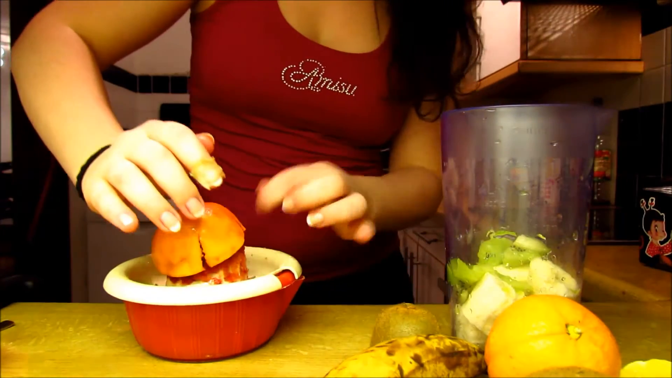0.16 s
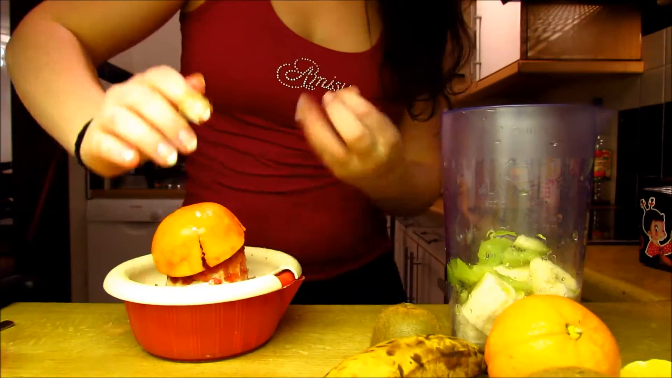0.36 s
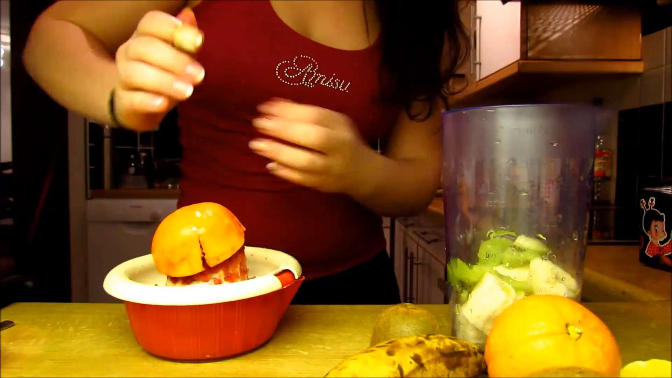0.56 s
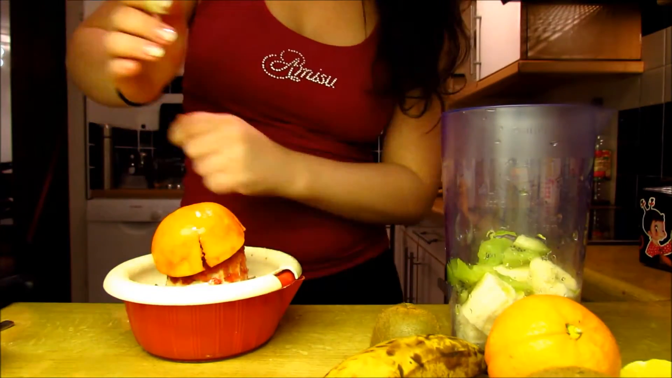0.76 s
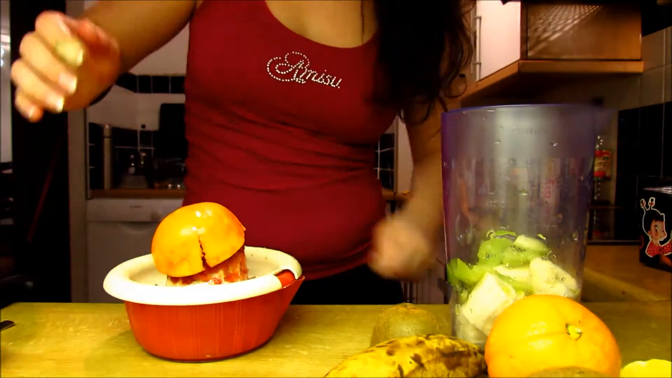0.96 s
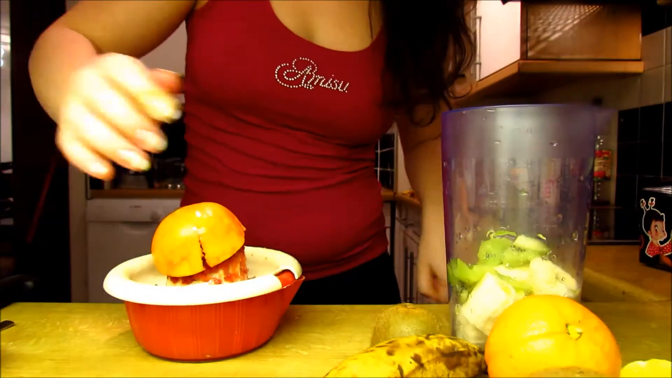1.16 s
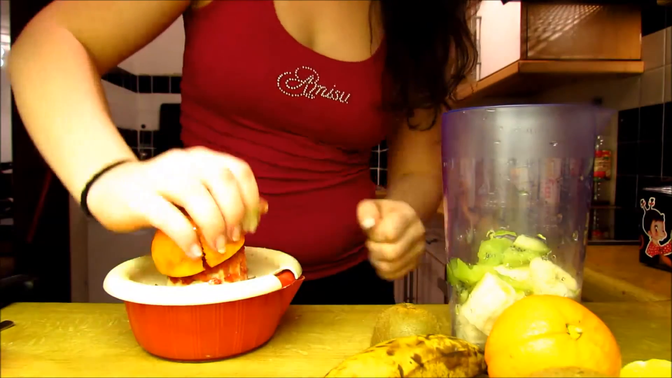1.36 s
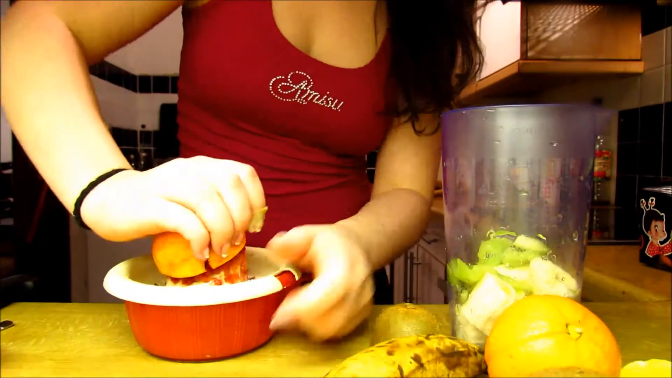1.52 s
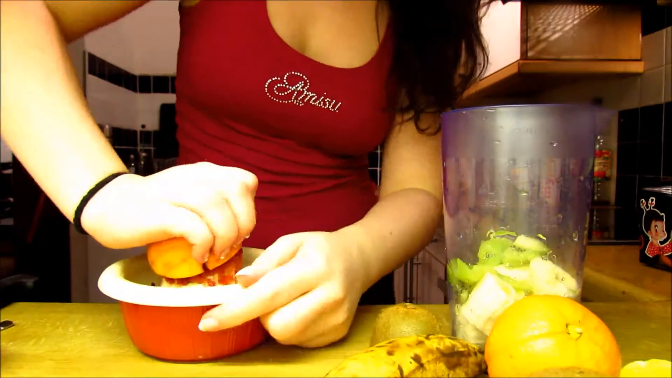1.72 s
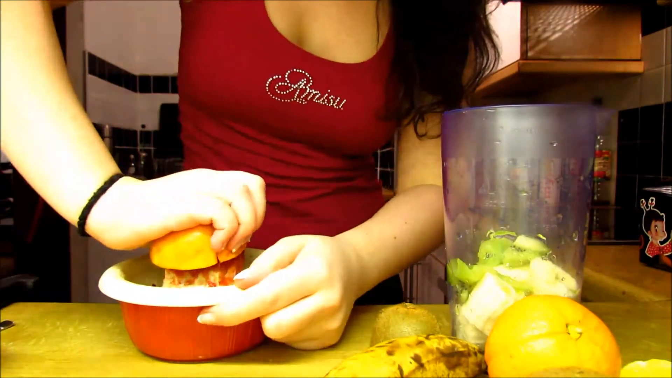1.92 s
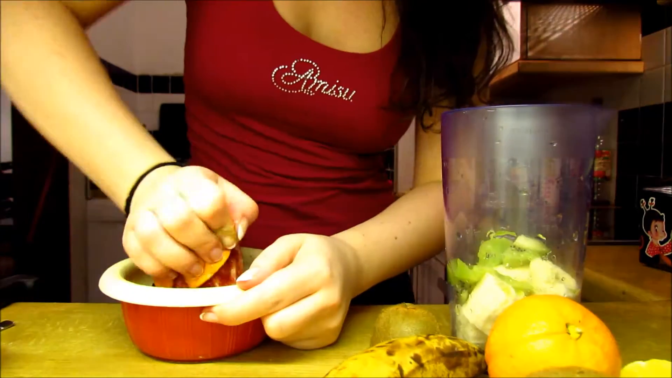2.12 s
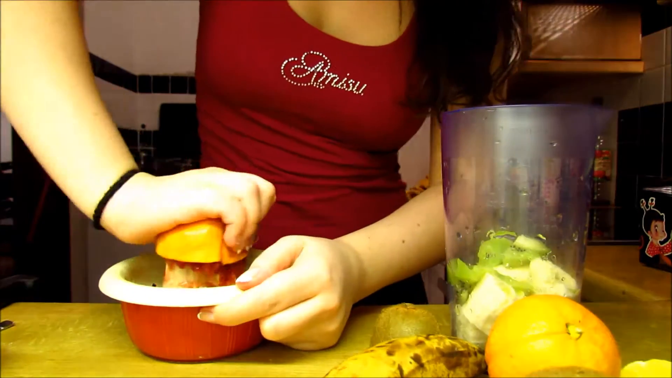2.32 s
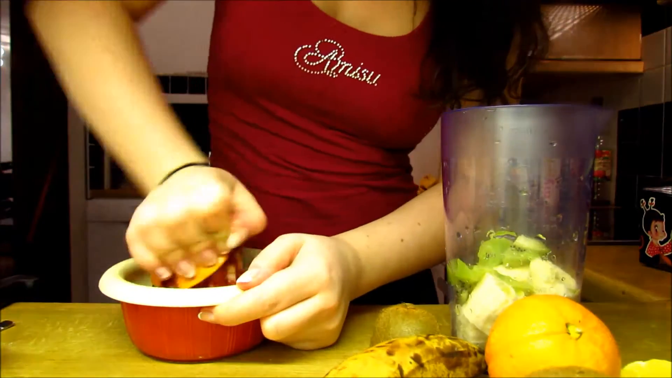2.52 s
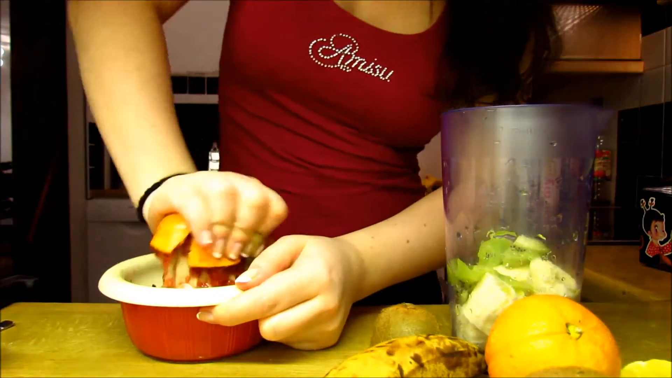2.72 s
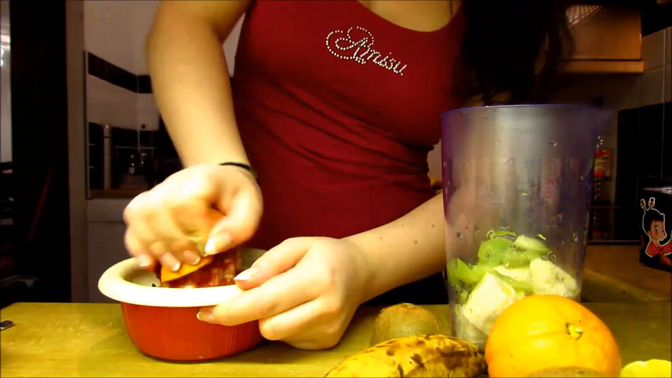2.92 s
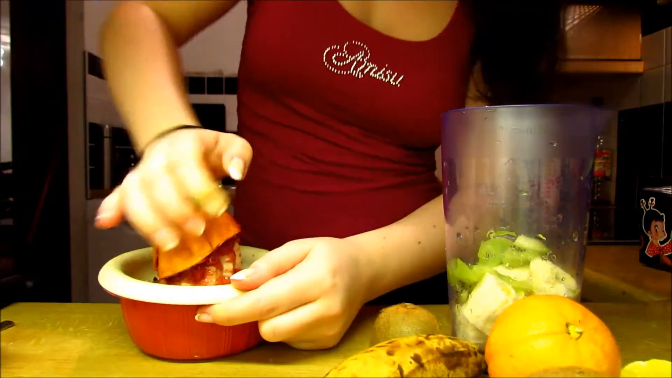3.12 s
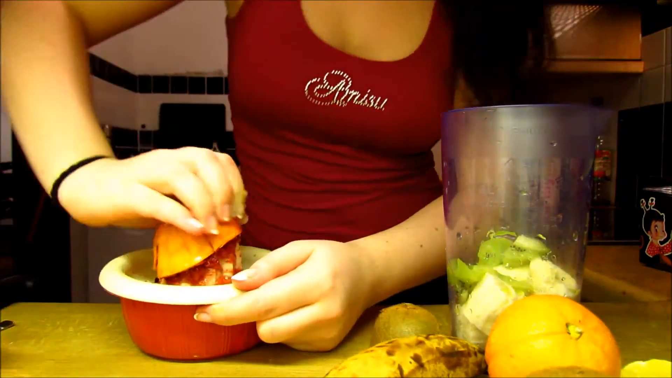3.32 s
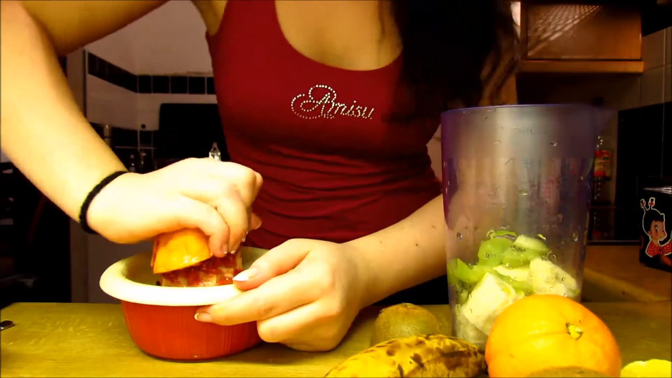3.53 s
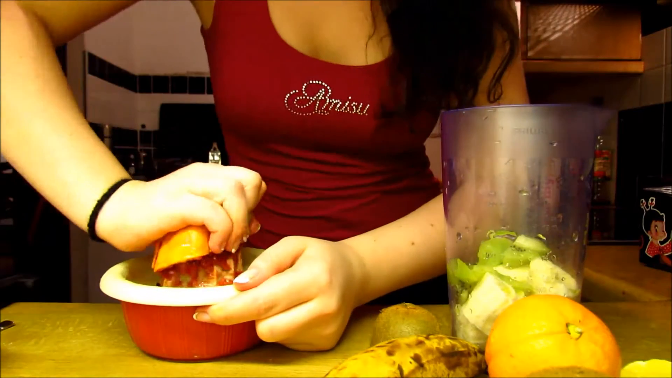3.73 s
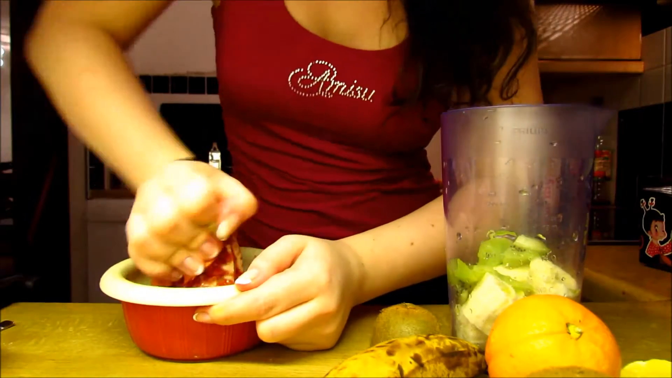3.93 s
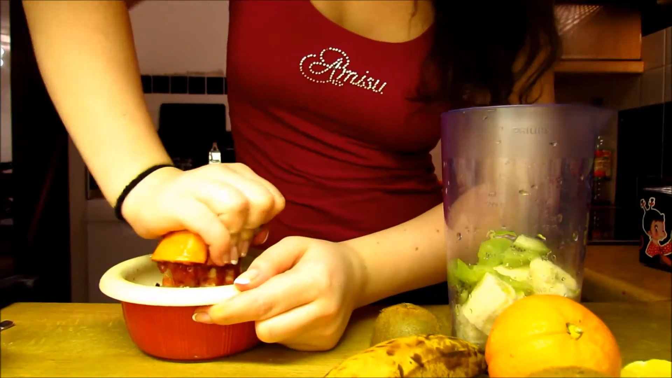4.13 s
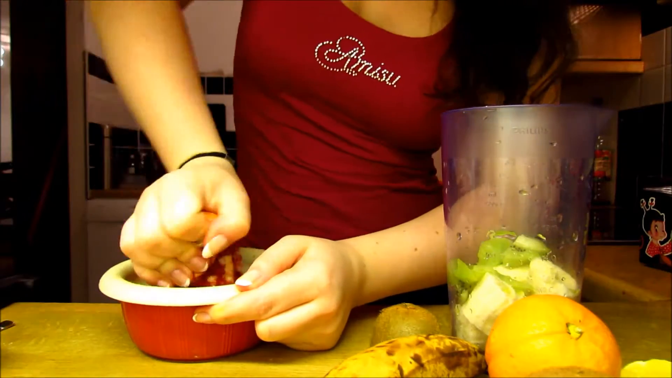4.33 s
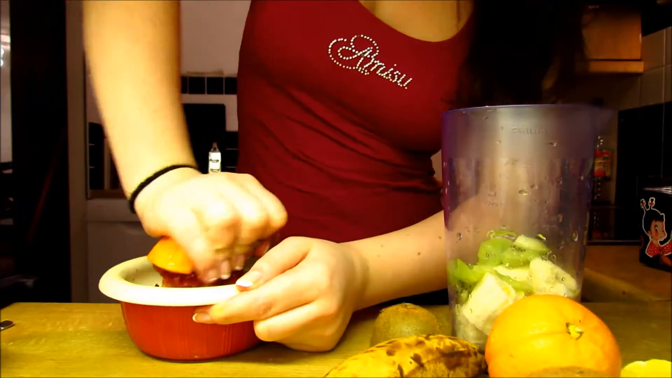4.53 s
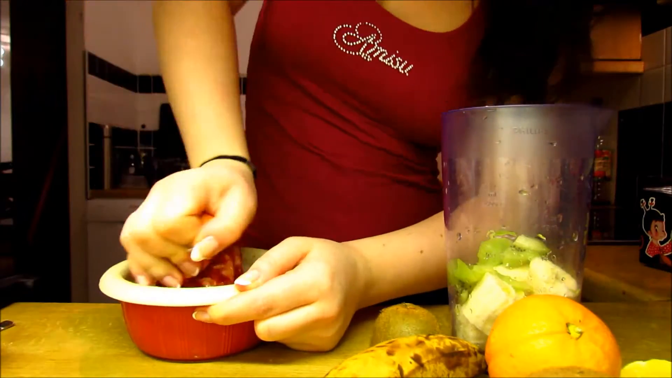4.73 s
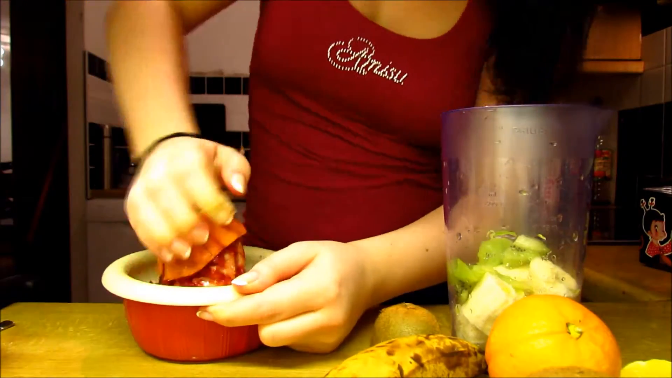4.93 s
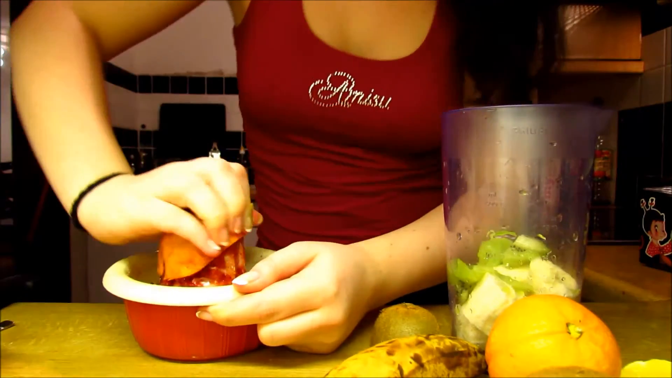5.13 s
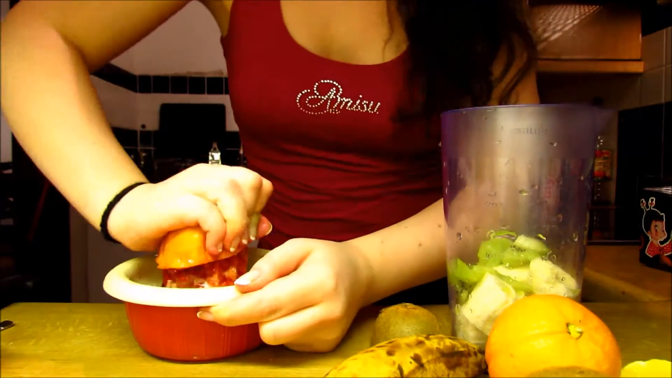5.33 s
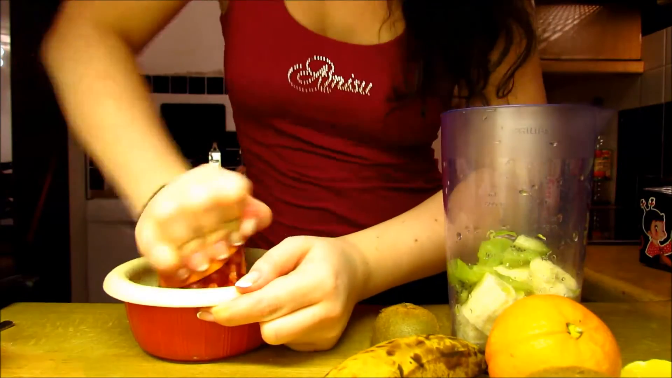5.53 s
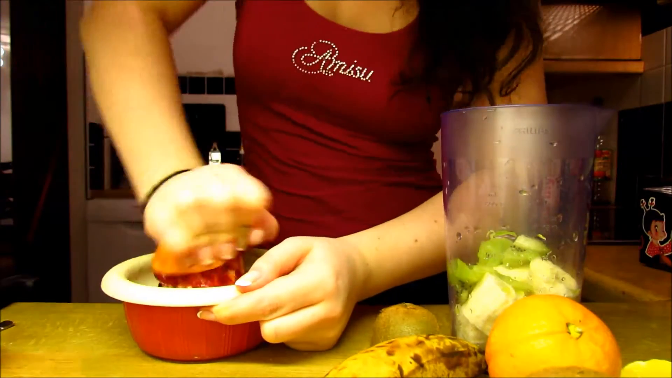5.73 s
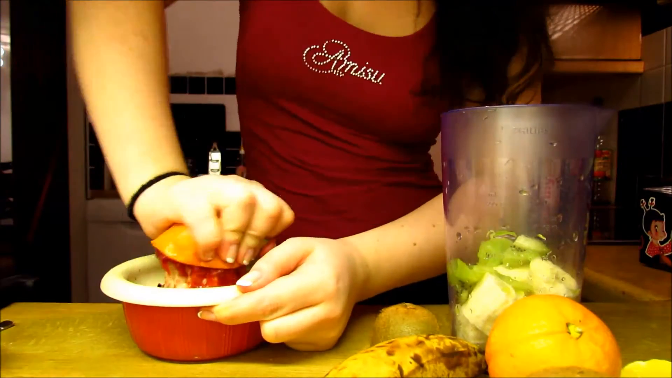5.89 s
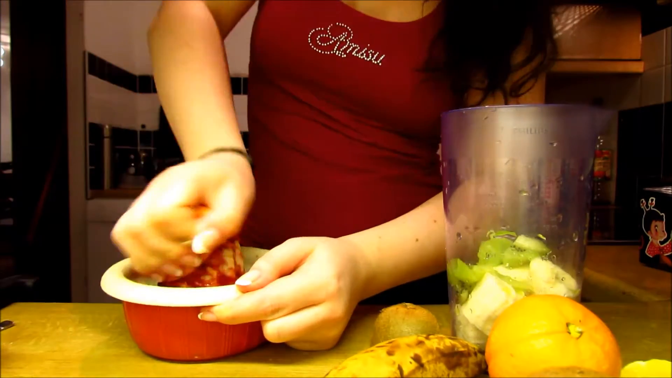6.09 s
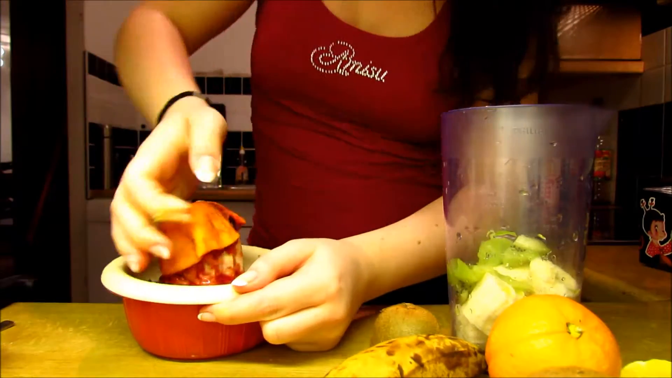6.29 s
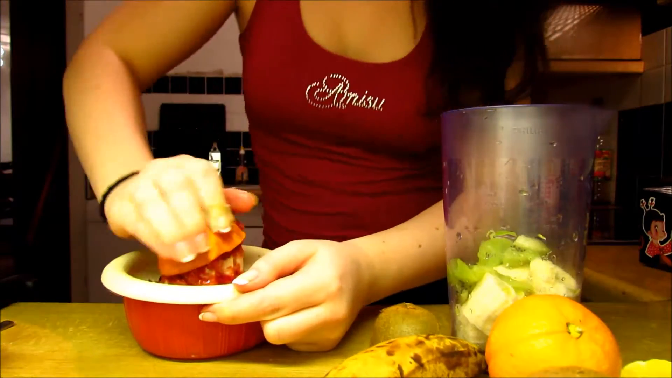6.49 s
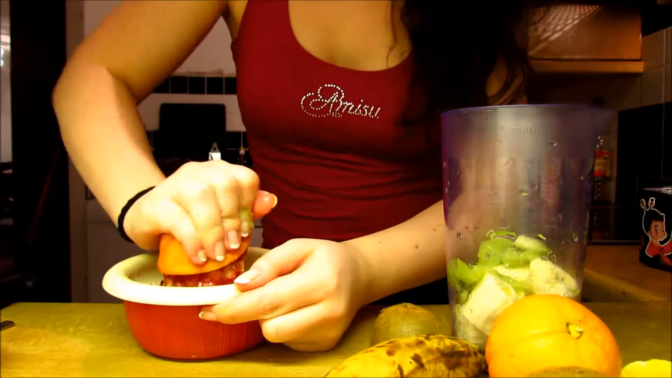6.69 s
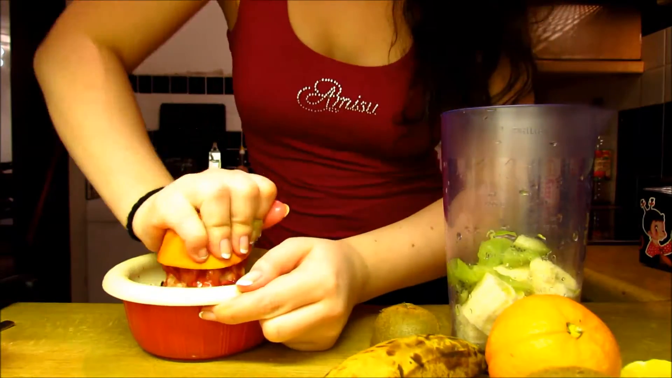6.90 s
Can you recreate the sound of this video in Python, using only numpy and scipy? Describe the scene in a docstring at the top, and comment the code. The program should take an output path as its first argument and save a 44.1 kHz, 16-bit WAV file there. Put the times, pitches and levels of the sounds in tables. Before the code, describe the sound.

A quiet kitchen with a low hum; fingers brush faintly over peel and skin. At about a second and a half a plastic juicer knocks sharply on the counter, then half an orange is ground on its ribs: wet crackling squishes, sharp juicy pops, fizz and scraping in irregular twists, with dull counter thuds. Close microphone, short small-room echo.

```python
"""Over a low kitchen hum, fingers brush skin and peel, a shove shakes the counter and a plastic juicer knocks.
A few pockets burst early; then half an orange is pressed and twisted by hand on the ribbed reamer.
Random ruptures, filtered by pulp, cavity and bowl, make the tearing and squish; chains of impulses make the bursts.
Noise bands, narrow and wide, spit and squeak during the middle twists; filtered blows make knocks and counter thuds.
A close hard reflection hollows the crackle, scattering widens it and a small kitchen answers; the microphone is close."""
import sys
import numpy as np
from scipy import signal
from scipy.fft import rfft, irfft, next_fast_len
from scipy.io import wavfile
from scipy.ndimage import map_coordinates

SR = 44100
rng = np.random.default_rng(int(sys.argv[2]) if len(sys.argv) > 2 else 0)


def persist_wave(psi):
    """Save psi, clipped to +-1, as 16-bit WAV."""
    counts = np.round(np.clip(psi, -1, 1) * 32767).astype(np.int16)
    wavfile.write(sys.argv[1], SR, np.atleast_2d(counts).T)


N = 310977  # length [samples]

# Spectrum of the room's noise: (frequency [Hz], relative level [dB])
KITCHEN_SPECTRUM = [(12, -29), (20, -13), (60, -8.5), (93, 0.5), (120, -9), (377, -11), (422, -16),
                    (472, -16), (642, -18.5), (1220, -21), (1330, -23.5), (1570, -21), (2080, -25),
                    (5680, -30), (16000, -38)]
# Appliance hum: (frequency [Hz], rms level [dB])
HUM_TONES = [(91, -71.5), (195, -76), (379, -78)]
# Left-right likeness of the room's noise: (frequency [Hz], likeness [0-1])
ROOM_LIKENESS = [(40, 0), (120, 0), (260, 0), (700, 0), (3000, 0.14), (12000, 0.24)]

# Fingers leave the peel, brush the wrist and close on the fruit: (start [s], length [s], relative level [dB])
BRUSHES = [(0, 0.0065, -50), (.12, 0.17, -64.5), (.79, 0.018, -60), (.89, 0.091, -57), (1.47, 0.24, -54)]
BRUSH_RISE_S, BRUSH_FALL_S = 0.15, 0.13  # every rise and fall time of a gesture spans 20 dB
# Spectrum of skin sliding and fibres snapping: (frequency [Hz], relative level [dB])
SKIN_SPECTRUM = [(300, 0.5), (1000, 3), (2000, 4), (2800, 3.5), (4000, 2), (5700, 4), (9000, -3.5),
                 (16000, -14)]

# Shoves of the arm that shake the counter: (start [s], length [s], relative level [dB])
SHOVES = [(.01, 0.067, -42), (1.61, .06, -45), (2.5, 0.043, -45), (4.28, 0.076, -44), (4.5, 0.22, -48.5)]
SHOVE_RISE_S, SHOVE_FALL_S = 0.08, 0.021
# Spectrum of the deep shudder: (frequency [Hz], relative level [dB])
SHUDDER_SPECTRUM = [(15, -13), (35, 22), (65, 14.5), (110, 23), (250, -31)]
# Modes of the counter under the bowl: (frequency [Hz], width [Hz], relative level [dB])
COUNTER_MODES = [(82.5, 28, -17.5), (126, 24, -3), (195.6, 16.3, 6.5), (225.4, 59, -4)]
RUMBLE_DB, SHUDDER_DB = -4, -5  # rumble against the scrape; shudder against the weight

# Knocks of the juicer on the counter; the last levels are relative to the first, before each part's trim:
# (time [s], level [dB], thud [dB], thud pitch [Hz], clack [dB], rim ring [dB])
KNOCKS = [(.011, -28.5, -4.5, 126, -15.5, 1), (1.394, -44, -5, 180, -8, -12),
          (1.548, -43.5, -20, 180, -2, 4), (1.588, -36, -25, 180, -4, -12),
          (1.5952, -23, -2.5, 196, 9, -12), (1.608, -36.5, 5.5, 199, 4, -6), (1.617, -32, 4, 166, 3, -3),
          (1.631, -43, -5, 170, 6, -4), (1.675, -51, 13, 170, 1, -12), (3.121, -36.5, -7, 190, -5, -2),
          (3.29, -42, -7, 190, -0.5, -13), (3.919, -30, -6, 200, -14, -17),
          (4.067, -36.5, -0.5, 149, 1, -8), (4.65, -47.5, 6.5, 150, -3, -10), (5.093, -41, 2, 200, -7, -8),
          (5.589, -32.5, -9, 180, 4, -8), (5.607, -28, -6.5, 180, -7, -9), (6.172, -42, 9.5, 203, 7, -14),
          (6.211, -48, -2, 200, 13, -8), (6.279, -35.5, -5, 210, 6.5, -2), (6.552, -45.5, 2.5, 210, -8, -3)]
# Modes of the plastic bowl: (frequency [Hz], width [Hz], relative level [dB])
BOWL_MODES = [(770.3, 45, 10.5), (832, 68, 4.5), (886, 45, -2.5), (1050, 170, -6.5), (1466, 52, -10),
              (1560, 61, -9), (2070, 38, -11), (2994, 91, -6), (3530, 67, -16.5)]
# Mode of the bowl's rim: (frequency [Hz], width [Hz], relative level [dB])
RIM_MODES = [(980, 100, 0)]
# Spectrum of the hard clack: (frequency [Hz], relative level [dB])
CLACK_SPECTRUM = [(250, -34), (580, -18), (900, 9.5), (1400, 3), (2000, 6), (3400, 4.5), (4500, -3),
                  (7000, -4), (11000, -15), (16000, -19)]
THUD_WIDTH, TREMBLE_WIDTH = 1, 1  # bandwidth over pitch

# Wet pockets bursting in the pulp or between sticky fingers, spray against the ring:
# (time [s], level over 5 ms [dB], pitch [Hz], bandwidth over pitch [ratio], spray [dB])
POCKETS = [(0.81, -52.5, 2600, 0.5, -11), (0.822, -57, 2700, 0.5, -16), (1.78, -37, 2670, 0.46, 0),
           (1.859, -48.5, 3460, 0.21, -4), (1.939, -46, 4800, 1.6, -8), (1.976, -50, 4000, 0.8, -15),
           (1.999, -49, 2300, 0.4, -11), (2.077, -39, 3170, 0.52, -29), (2.092, -29.5, 2450, 0.38, 2),
           (2.1, -33, 2270, 0.39, -2), (2.107, -32, 2330, 0.32, -15), (2.174, -39, 5430, 1.4, 7),
           (2.2255, -28.5, 2380, 1.1, -4), (2.235, -29.5, 2060, 0.26, -9), (2.2505, -27.5, 3000, 0.4, -14),
           (2.3495, -35.5, 2580, 1.1, 1), (2.4243, -38.5, 4200, 0.34, -30), (2.484, -39, 2860, 1.1, 4),
           (2.502, -39.5, 6400, 0.33, -12), (2.578, -45, 2000, 0.4, -5), (2.624, -34.5, 2940, 0.28, -14),
           (2.699, -33, 3300, 0.46, -3), (2.712, -40.5, 3380, 0.95, -15), (2.734, -45, 11500, 0.5, -5),
           (2.7412, -37, 7800, 0.71, 10), (2.782, -43.5, 7050, 0.24, 2), (2.808, -40.5, 2940, 0.59, -3),
           (2.8233, -38, 8800, 0.18, -6), (2.85, -40, 7000, 0.9, -5), (2.8772, -32, 2640, 0.73, 7),
           (2.933, -38.5, 6540, 0.78, -27), (3.075, -35.5, 2320, 0.7, -20), (3.104, -48, 2400, 0.9, 3),
           (3.477, -45, 9000, 1.9, 5), (3.487, -47, 2380, 0.9, -1), (3.514, -51, 11000, 0.4, -10),
           (3.591, -47, 3200, 0.62, -5), (3.697, -41, 2860, 0.35, -20), (3.76, -46, 3200, 0.3, -5),
           (3.794, -47.5, 2320, 0.25, -5), (3.806, -42, 3100, 0.37, -25), (3.826, -39.5, 3400, 0.28, -12),
           (3.9065, -35.5, 11100, 0.35, -3), (3.919, -34.5, 2280, 0.35, 0), (4.015, -43.5, 2160, 0.64, 5),
           (4.039, -35, 1840, 0.35, -29), (4.074, -30.5, 8200, 0.87, -12), (4.2077, -25.5, 3160, 0.36, -25),
           (4.271, -27.5, 11100, 0.46, -11), (4.296, -35.5, 9100, 0.19, -11),
           (4.345, -39.5, 2300, 1.8, -11), (4.369, -43.5, 6300, 0.23, -20), (4.405, -45, 3280, 0.17, -25),
           (4.431, -37.5, 1320, 0.4, -14), (4.4335, -34, 2760, 0.9, -8), (4.449, -39, 2000, 0.44, -9),
           (4.502, -31.5, 2150, 0.67, -6), (4.5445, -30.5, 3360, 0.35, -37), (4.5584, -30, 3870, 0.68, -40),
           (4.5595, -31.5, 2070, 0.27, -33), (4.6, -42.0, 3300, 0.26, -23), (4.64, -29.5, 5330, 1.4, -15),
           (4.6435, -31.5, 4770, 0.93, -12), (4.661, -40, 7400, 1.6, -8), (4.692, -37.5, 2440, 1, -3),
           (4.742, -43, 8200, 0.86, -3), (4.771, -40, 2600, 1.7, 1), (4.836, -43, 2200, 0.8, 0),
           (5.214, -47, 2850, 0.27, -1), (5.232, -41.5, 1630, 0.6, -8), (5.3406, -35, 2670, 1.6, -6),
           (5.353, -40, 2700, 0.21, -15), (5.3716, -35.5, 5560, 0.42, -25), (5.41, -44, 7000, 0.81, -12),
           (5.471, -41.5, 5500, 0.9, -3), (5.482, -41, 2400, 0.47, -14), (5.586, -29, 2740, 2.3, 5),
           (5.596, -31.5, 2800, 0.83, -27), (5.6087, -20, 8600, 0.79, 3), (5.7215, -34.5, 2630, 1.1, -4),
           (5.734, -34.5, 3400, 0.43, -15), (5.766, -44, 3400, 0.41, -19), (5.784, -43, 10100, 0.13, -18),
           (5.892, -45.5, 3170, 0.36, -21), (5.908, -32, 5400, 0.34, -25), (5.9696, -38, 2760, 0.53, -5),
           (5.991, -40, 8100, 0.27, -10), (6.024, -40.5, 6440, 1.3, -3), (6.065, -46, 3800, 0.5, -11),
           (6.093, -36, 7550, 0.33, -15), (6.1104, -29, 4850, 1.07, -25), (6.152, -44, 5840, 0.3, -14),
           (6.257, -47, 1500, 0.72, -16), (6.436, -52, 8800, 0.8, 4), (6.529, -48, 10800, 0.78, -10),
           (6.537, -44, 5500, 1.2, -25), (6.614, -45.5, 1520, 1.3, -11), (6.664, -46, 8300, 0.66, -6),
           (6.687, -40.5, 2380, 0.22, -19), (6.714, -46, 2840, 0.28, -25), (6.768, -40.5, 1940, 0.2, -10),
           (6.769, -38.5, 4560, 0.7, -9), (6.995, -34.5, 6160, 0.58, -6)]
CHAIN_DB = -7  # smaller bursts against the main snap
POCKET_T60_S, POCKET_REF_HZ = 0.034, 3000  # life of the chain at the reference pitch
POCKET_LIFE_LAW = .25  # exponent: higher, smaller pockets are over sooner
# Spectra of tearing pulp and of juice: (frequency [Hz], relative level [dB])
PULP_SPECTRUM = [(200, 3.5), (550, -10), (1000, -4), (1600, -1.5), (3000, -4.5), (5500, -3.5), (7500, -13),
                 (15000, -15.5)]
JUICE_SPECTRUM = [(1000, -7.5), (3500, -1.5), (6500, 6.5), (10000, 3.5), (13000, -3), (16000, -14)]

# Small pockets burst at random from the first slip to the last twist
SMALL_START_S, SMALL_END_S = 1.75, 7.05
SMALL_DB, SMALL_SPREAD_DB, SMALL_SPRAY_DB = -4, 1.5, -4.5  # the first is against the squish
SMALL_LIMIT_DB = -50.5  # a harder squish than this makes them no louder
SMALL_HZ, SMALL_PITCH_SPREAD, SMALL_WIDTH = 3100, 0.46, 0.45  # spread of log pitch; bandwidth over pitch

# The fruit slips over the ribs, fizz and scrape against the squish:
# (start [s], length [s], squish [dB], fizz [dB], scrape [dB])
SLIPS = [(1.779, 0.039, -41, -2.5, -11.5), (2.088, 0.014, -29.5, -7.5, -10),
         (2.23, 0.012, -32.5, -1.5, -9.5), (2.308, 0.08, -43.5, -21, -12), (2.474, 0.064, -40, -3, -4.5),
         (2.67, 0.031, -40.5, -2.5, -5), (2.862, 0.038, -48.5, -5, 0), (2.91, 0.17, -42.5, -19, -25),
         (3.48, 0.045, -51, -16, -10), (3.874, 0.0087, -40.5, 1.5, -1.5), (3.917, 0.013, -39, 0.5, -4),
         (4.018, 0.057, -41.5, -11, -5), (4.201, 0.013, -36.5, -27, -12), (4.273, 0.027, -36.5, -1, -9),
         (4.443, 0.0051, -38, -10, -22), (4.642, 0.012, -37.5, -2.5, -27), (4.772, 0.086, -40, -9.5, -3.5),
         (5.096, 0.026, -55, -5.5, 7.5), (5.206, 0.067, -49, -4, -4.5), (5.346, 0.019, -44, -2.5, -3),
         (5.463, 0.018, -41.5, -3, -1.5), (5.563, 0.027, -36.5, -10, -3.5), (5.693, 0.051, -42, -4.5, -4.5),
         (5.907, 0.0076, -42.5, -23, -5), (5.96, 0.045, -45, 1.5, -6), (6.092, 0.06, -44.5, -2, -10),
         (6.662, 0.019, -44, -1, -16), (6.958, 0.015, -45, -5, -1.5), (6.986, 0.04, -40, 3, -5.5)]
SLIP_RISE_S, SLIP_FALL_S = 0.032, 0.06
# Twists of the wrist, each a steady press: (start [s], length [s], squish [dB], weight on the counter [dB])
TWISTS = [(1.983, 0.59, -44.5, -58), (2.696, 0.41, -47, -55.5), (3.813, 0.057, -46, -59),
          (4.096, 0.24, -45, -50), (4.476, 0.17, -45, -60), (4.751, 0.16, -46.5, -56.5),
          (5.474, 0.33, -47.5, -53), (5.904, 0.32, -47.5, -57.5), (6.58, 0.6, -52.5, -59.5)]
TWIST_RISE_S, TWIST_FALL_S = 0.1, 0.082
TWIST_FIZZ_DB, TWIST_SCRAPE_DB = -6.5, -10  # against the squish
SEEP_DB = -61.5  # the pulp seeps on between twists
# Modes of the loose cavity between peel and reamer: (frequency [Hz], width [Hz], relative level [dB])
CAVITY_MODES = [(1893, 100, 11.5), (2380, 44, 11.5), (2940, 180, 9), (3540, 700, 0.5), (3920, 390, 5),
                (5400, 53, 6)]
CAVITY_SHIFT = 1.14  # mode pitch, tight cavity over loose
FIBRE_RATE, FIBRE_DB = 140, -11  # snaps per second; level against the squish

# Juice or air forced through a gap under the peel:
# (start [s], length [s], relative level [dB], pitch [Hz], width [Hz], glide [Hz/s])
JETS = [(2.03, 0.43, -47.5, 5480, 1200, 0), (2.93, 0.12, -42.5, 3100, 2410, -5),
        (4.037, 0.26, -50.5, 5650, 1200, 0), (4.807, 0.093, -46, 2380, 160, -400),
        (4.924, 0.13, -59, 2350, 160, -650), (4.78, 0.266, -51, 1890, 2030, -600)]
JET_FLUTTER_DB = 1.5  # the flow is unsteady

# Reflection from a hard surface beside the juicer: delay, strength, band returned
BOUNCE_S, BOUNCE_GAIN, BOUNCE_LOW_HZ, BOUNCE_HIGH_HZ = .00142, .38, 1500, 8000
# Scattered side signal against mid: (frequency [Hz], level [dB])
SIDE_SPECTRUM = [(80, -59), (300, 7), (700, -10), (1300, -6), (3000, -5), (5000, -6.5), (8000, -1.5),
                 (15000, -0.5)]
# Time for the room's echo to decay by 60 dB: (frequency [Hz], time [s])
WALL_T60 = [(150, 0.46), (400, 0.2), (1000, 0.27), (3000, 0.18), (8000, 0.14), (15000, 0.16)]
TOP_HZ = 16100  # band limit of the recorder


def amp(db):
    """Level law: decibels to amplitude gain."""
    return 10 ** (np.asarray(db) / 20)


def unit(x):
    """Power normalisation: scale to rms 1."""
    return x / np.sqrt(np.mean(x ** 2) + 1e-20)


def crest(x):
    """Peak normalisation: scale to peak 1."""
    return x / (np.abs(x).max() + 1e-20)


def along(points, hz):
    """Logarithmic pitch scale: interpolate (Hz, value) points on a log axis."""
    f, v = np.transpose(points)
    return np.interp(np.log(hz + 1), np.log(f + 1), v)


def wobble(rate):
    """Slow random modulation: a smooth curve through `rate` random knots a second."""
    knots = rng.standard_normal(int(N * rate / SR) + 4)
    return map_coordinates(knots, [np.arange(N) * rate / SR])


def filtered(x, response):
    """Linear filtering: multiply the spectrum by a complex response of frequency."""
    n = x.shape[-1]
    m = next_fast_len(n + 8192)  # zero padding gives tails room
    return irfft(rfft(x, m) * response(np.fft.rfftfreq(m, 1 / SR)), m)[..., :n]


def colour(x, points, size=1024):
    """Minimum phase: a folded cepstrum turns a spectrum into a causal filter."""
    cepstrum = irfft(np.log(amp(along(points, np.fft.rfftfreq(size, 1 / SR)))))
    cepstrum[1:size // 2] *= 2
    cepstrum[size // 2 + 1:] = 0
    impulse = irfft(np.exp(rfft(cepstrum)))
    return signal.fftconvolve(x, impulse)[:len(x)]


def resonate(x, modes):
    """Modal superposition: x excites damped resonances of alternating sign."""
    def response(f):
        total = 0
        for k, (centre, width, db) in enumerate(modes):
            mode = 1j * f * width / (centre * centre - f * f + 1j * f * width)
            total = total + (-1) ** k * amp(db) * mode
        return total
    return filtered(x, response)


def add(track, s, sound):
    """Superposition: mix a sound in at time s."""
    start = max(0, round(s * SR))
    part = track[start:start + len(sound)]
    part += sound[:len(part)]


def crackle(rate, spread_db, clump_db):
    """Random impulse process: tiny ruptures of uneven size that come in clumps; rms 1."""
    hit = rng.random(N) < rate / SR
    level_db = spread_db * np.minimum(rng.standard_normal(N), 2) + clump_db * np.tanh(wobble(110))
    sign = np.sign(rng.standard_normal(N))
    return unit(hit * amp(level_db) * sign)


def gesture(start, length, rise_s, fall_s):
    """Exponential envelope: swells, holds at 1 and fades, by 20 dB in rise_s and fall_s."""
    t = np.arange(N) / SR
    outside = np.maximum(start - t, 0) / rise_s + np.maximum(t - start - length, 0) / fall_s
    return amp(-20 * np.minimum(outside, 10))


def gestures(rows, rise_s, fall_s):
    """Superposition of (start, length, dB) envelopes."""
    return sum(amp(db) * gesture(s, length, rise_s, fall_s) for s, length, db in rows)


def effort():
    """Power addition: twists, seep and slips combine into squish, fizz and scrape; twists alone give weight."""
    presses = [(s, length, db) for s, length, db, _ in TWISTS]
    loads = [(s, length, db) for s, length, _, db in TWISTS]
    press = gestures(presses, TWIST_RISE_S, TWIST_FALL_S)
    weight = gestures(loads, TWIST_RISE_S, TWIST_FALL_S)
    seep = amp(SEEP_DB) * (np.arange(N) / SR > SMALL_START_S)
    shares = amp([0, TWIST_FIZZ_DB, TWIST_SCRAPE_DB])
    power = np.outer(shares ** 2, press ** 2 + seep ** 2)
    for s, length, db, fizz_db, scrape_db in SLIPS:
        surge = gesture(s, length, SLIP_RISE_S, SLIP_FALL_S)
        power += np.outer(amp([db, db + fizz_db, db + scrape_db]) ** 2, surge ** 2)
    squish, fizz, scrape = np.sqrt(power)
    return squish, fizz, scrape, weight


def background():
    """Partial coherence and phase modulation: steady stereo room noise and an appliance's unsteady hum."""
    def mid_side(hz):
        # this split of mid and side sets the left-right correlation
        turn = np.arccos(np.clip(along(ROOM_LIKENESS, hz), -1, 1)) / 2
        return amp(along(KITCHEN_SPECTRUM, hz)) * [np.cos(turn), np.sin(turn)]
    mid, side = filtered(rng.standard_normal((2, N)), mid_side)
    t = np.arange(N) / SR
    hum = 0
    for hz, db in HUM_TONES:
        phase = 2 * np.pi * hz * t + 0.26 * wobble(12)
        hum = hum + amp(db) * np.sqrt(2) * np.sin(phase)
    return amp(-51.0) * unit(np.array([mid + side, mid - side])) + hum


def brushing():
    """Sliding friction: fingers over peel and wrist make a dense train of faint ruptures."""
    slide = unit(colour(crackle(rate=9000, spread_db=7.5, clump_db=1.0), SKIN_SPECTRUM))
    return amp(-2.0) * gestures(BRUSHES, BRUSH_RISE_S, BRUSH_FALL_S) * slide


def leaning(weight, scrape):
    """Forced vibration: arm weight and scraping ribs rumble in the counter; shoves shake it."""
    rumble_gain = np.hypot(weight, amp(RUMBLE_DB) * scrape)
    shoving = gestures(SHOVES, SHOVE_RISE_S, SHOVE_FALL_S)
    shudder_gain = np.hypot(amp(SHUDDER_DB) * weight, shoving)
    shake = unit(filtered(rng.standard_normal(N), lambda hz: amp(along(SHUDDER_SPECTRUM, hz))))
    rumble = unit(resonate(rng.standard_normal(N), COUNTER_MODES))
    return amp(-4) * rumble_gain * rumble + amp(-4.0) * shudder_gain * shake


def knocks(clack_t60=0.029, rise_s=0.00042, soft_hz=4200, settle_db=-14, settle_t60=0.19):
    """Impact excitation: a blow rings bowl and rim, clacks the foot and pushes the counter, which trembles on."""
    track, t = np.zeros(N), np.arange(SR // 3) / SR
    contact = 1 - np.exp(-t / rise_s)  # the fruit cushions the blow
    for s, db, thud_db, thud_hz, clack_db, rim_db in KNOCKS:
        corner = soft_hz * amp(clack_db / 2)  # a soft blow reaches only the low modes
        blow = filtered(1. * (t == 0), lambda hz: 1 / (1 + 1j * hz / corner) ** 2)
        bowl = amp(-2.0) * crest(contact * resonate(blow, BOWL_MODES))
        rim = amp(rim_db) * crest(resonate(blow, RIM_MODES))

        clatter = rng.standard_normal(len(t)) * contact * amp(-60 * t / clack_t60)
        clack = amp(clack_db + 1.5) * crest(colour(clatter, CLACK_SPECTRUM))

        tremble_mode = [(thud_hz, TREMBLE_WIDTH * thud_hz, 0)]
        tremble = unit(resonate(rng.standard_normal(len(t)), tremble_mode))
        settling = amp(settle_db - 60 * t / settle_t60) * contact * tremble
        thud_mode = [(thud_hz, THUD_WIDTH * thud_hz, 0)]
        push = crest(resonate(resonate(blow, thud_mode), COUNTER_MODES))
        thud = amp(thud_db - 2.0) * (push + settling)
        add(track, s, amp(db) * (bowl + rim + clack + thud))
    return track


def pockets(rows, wet_db=-13, swell_cycles=12):
    """Cavity resonance: a pocket swells, snaps and sets off smaller bursts, which ring it and throw spray."""
    track, lead = np.zeros(N), SR // 100  # the swell leads the snap by 10 ms
    t = np.arange(-lead, SR // 25) / SR
    for s, db, hz, width, spray_db in rows:
        swell = np.exp(np.minimum(t, 0) * hz / swell_cycles * 2)  # big, low pockets open more slowly
        chain = amp(CHAIN_DB) * rng.standard_normal(len(t)) * (rng.random(len(t)) < .12)
        life_s = POCKET_T60_S * (POCKET_REF_HZ / hz) ** POCKET_LIFE_LAW
        decay = amp(-60 * np.maximum(t, 0) / life_s)
        bursts = chain * swell * decay + (t == 0)  # the last term is the main snap

        mode = [(hz, width * hz, 0)]
        ring = unit(resonate(resonate(bursts, mode), mode))
        wet = amp(wet_db) * unit(colour(bursts, PULP_SPECTRUM))
        spray = amp(spray_db) * unit(colour(bursts, JUICE_SPECTRUM))
        sound = ring + wet + spray
        five_ms = np.sqrt(.005 * SR)  # sets the total energy as an rms over 5 ms
        add(track, s - lead / SR, amp(db) * sound / np.linalg.norm(sound) * five_ms)
    return track


def small_pockets(squish, count=70):
    """Random point process: pocket rows at random times, louder where the pulp is squeezed harder."""
    times = rng.uniform(SMALL_START_S, SMALL_END_S, count)
    chance = np.clip(rng.standard_normal((count, 2)), -2, 2)
    squish_db = np.minimum(20 * np.log10(squish + 1e-9), SMALL_LIMIT_DB)
    rows = []
    for s, (loud, high) in zip(times, chance):
        db = squish_db[min(int(s * SR), N - 1)] + SMALL_DB + SMALL_SPREAD_DB * loud
        hz = SMALL_HZ * np.exp(SMALL_PITCH_SPREAD * high)
        rows.append((s, db, hz, SMALL_WIDTH, SMALL_SPRAY_DB))
    return rows


def cavity(x):
    """Volume-dependent resonance: the hollow under the peel shifts its colour as it is squeezed; rms 1."""
    squeeze = np.pi / 4 * (1 + np.tanh(2 * wobble(14) - 1))
    tight_modes = [(hz * CAVITY_SHIFT, width, db) for hz, width, db in CAVITY_MODES]
    loose = np.cos(squeeze) * resonate(x, CAVITY_MODES)
    tight = np.sin(squeeze) * resonate(x, tight_modes)
    return unit(loose + tight)


def bubbles(hz, scatter, cycles, spread_db, count=3000):
    """Bubble resonance: each small bubble rings briefly at its own pitch; rms 1."""
    when, pitch, size = rng.random(count), rng.standard_normal(count), rng.standard_normal(count)
    f = np.clip(hz * np.exp(scatter * pitch), 1000, 13000)[:, None]
    n = np.arange(SR // 150)
    turns = f * n / SR
    level = amp(spread_db * np.minimum(size, 2))[:, None]
    wave = np.sin(2 * np.pi * turns) * np.exp(-turns / cycles) * level
    places = (when * N).astype(int)[:, None] + n
    return unit(np.bincount(places.ravel(), wave.ravel(), N)[:N])


def twisting(squish, fizz, scrape):
    """Fracture and bubbling: ribs tear pulp, snap fibres, squeeze out fizzing juice and scrape the bowl."""
    tearing = amp(-9.0) * unit(colour(crackle(rate=8700, spread_db=7.0, clump_db=5.5), PULP_SPECTRUM))
    hollow = amp(-10.0) * cavity(crackle(rate=1300, spread_db=1.5, clump_db=9.5))
    froth = amp(-15.0) * bubbles(hz=2870, scatter=0.42, cycles=2.2, spread_db=0.0)
    juice = amp(-4.5) * unit(colour(crackle(rate=4000, spread_db=7, clump_db=9.5), JUICE_SPECTRUM))
    foam = amp(-9.0) * bubbles(hz=7740, scatter=0.41, cycles=3, spread_db=1)
    snaps = crackle(rate=FIBRE_RATE, spread_db=2.5, clump_db=5.0)
    fibres = amp(FIBRE_DB) * unit(colour(snaps, SKIN_SPECTRUM))
    ribs = amp(-2.5) * unit(resonate(crackle(rate=1100, spread_db=7.5, clump_db=-3.0), BOWL_MODES))
    return squish * (tearing + fibres + hollow + froth) + fizz * (juice + foam) + scrape * ribs


def jets():
    """Flow noise: juice or air sputters in a band; a tight gap squeaks, sinking as the pressure eases."""
    track, t = np.zeros(N), np.arange(N) / SR
    for s, length, db, hz, width, glide in JETS:
        ruptures = np.array([crackle(rate=1300, spread_db=2.5, clump_db=7) for _ in range(2)])
        sputter = filtered(ruptures, lambda f: 1 / (1 + (2 * f / width) ** 2) ** 2)
        # a quadrature pair of carriers moves the low band up to the pitch
        phase = 2 * np.pi * np.cumsum(hz + glide * np.clip(t - s, 0, length)) / SR
        hiss = unit(sputter[0] * np.cos(phase) + sputter[1] * np.sin(phase))
        level = amp(db + JET_FLUTTER_DB * np.tanh(wobble(45)))
        track += level * gesture(s, length, TWIST_RISE_S, TWIST_FALL_S) * hiss
    return amp(-6) * track


def bounce(x):
    """Comb interference: a hard surface returns the low treble a moment later and hollows every crackle."""
    def response(hz):
        low_cut = hz ** 2 / (hz ** 2 + BOUNCE_LOW_HZ ** 2)
        band = low_cut / (1 + (hz / BOUNCE_HIGH_HZ) ** 2)
        return 1 + BOUNCE_GAIN * band * np.exp(-2j * np.pi * hz * BOUNCE_S)
    return filtered(x, response)


def nearby(x, scatter_t60=0.012, size=8192):
    """Scattering: a random side pattern, redrawn each block, keeps the colour from standing still."""
    side, t = np.zeros(N), np.arange(size // 8) / SR
    for start in range(0, N, size):
        scatter = rng.standard_normal(len(t)) * amp(-60 * t / scatter_t60)
        scatter = scatter / np.linalg.norm(scatter)
        add(side, start / SR, signal.fftconvolve(x[start:start + size], scatter))
    return filtered(side, lambda hz: amp(along(SIDE_SPECTRUM, hz)))


def room(x, wet_db=-7, build_s=0.00049, size=16384):
    """Diffuse reverberation: a random echo for each side, redrawn each block, keeps the colour from standing still."""
    starts = range(0, N, size)
    noise = rng.standard_normal((len(starts), 2, SR // 4))
    hz, t, z = signal.stft(noise, SR, nperseg=256)
    decay = amp(-60 * t / along(WALL_T60, hz)[:, None])
    tails = signal.istft(z * decay, SR, nperseg=256)[1]
    tails = tails * (1 - np.exp(-np.arange(tails.shape[-1]) / SR / build_s))
    echo = np.zeros((2, N))
    for start, pair in zip(starts, tails):
        for track, tail in zip(echo, pair):
            add(track, start / SR, signal.fftconvolve(x[start:start + size], tail / np.linalg.norm(tail)))
    return amp(wet_db) * echo


def scene():
    """Superposition and coupling: the juicer stands almost straight ahead; bursts also ring its bowl."""
    squish, fizz, scrape, weight = effort()
    bursting = pockets(POCKETS + small_pockets(squish))
    bowl_ring = amp(9.5) * resonate(bursting, BOWL_MODES)
    pulp = amp(-0.58) * twisting(squish, fizz, scrape) + jets() + bursting + bowl_ring
    juicer = bounce(pulp + leaning(weight, scrape) + knocks() + brushing())
    side = nearby(juicer)
    close = np.array([juicer + side, juicer - side])
    balance = amp([[-.3], [.3]])  # left, right
    return (close + room(juicer)) * balance + background()


def record(dry):
    """Band limitation: a steep low-pass keeps almost nothing above the recorder's limit."""
    return filtered(dry, lambda hz: 1 / (1 + (hz / TOP_HZ) ** 120))


dry = scene()
out = record(dry)
persist_wave(out)
```